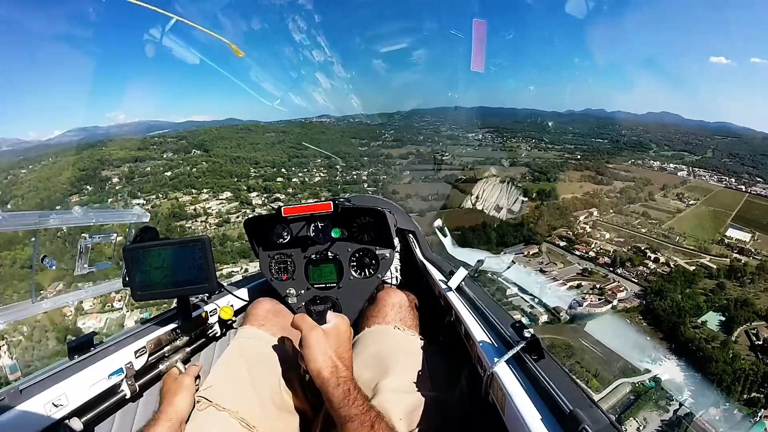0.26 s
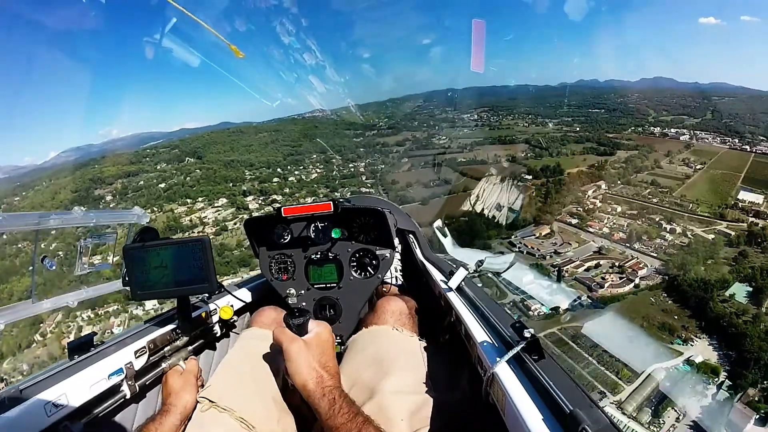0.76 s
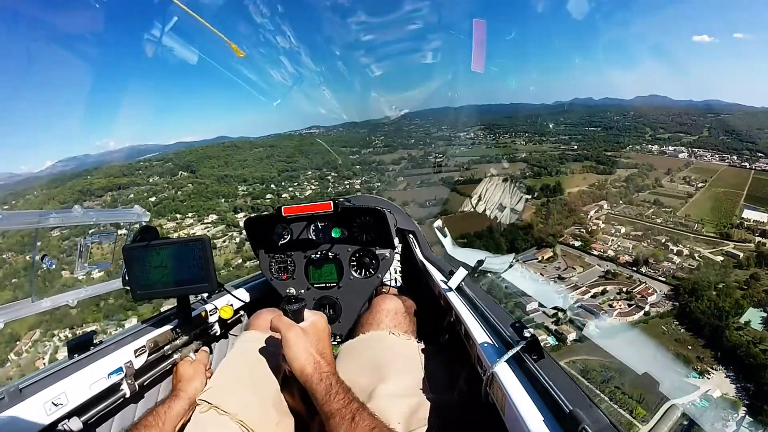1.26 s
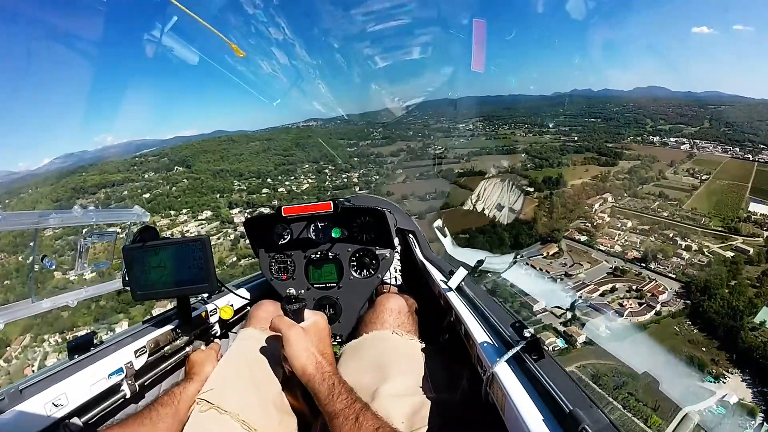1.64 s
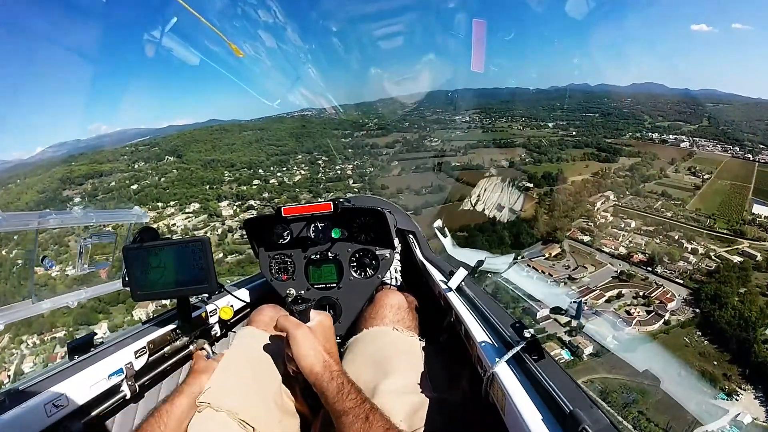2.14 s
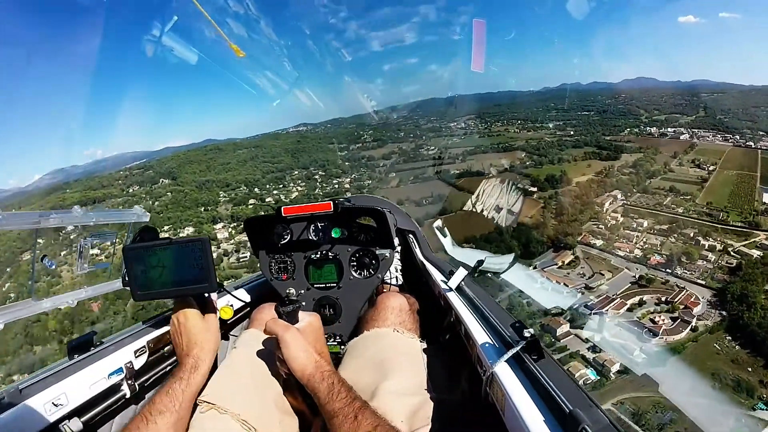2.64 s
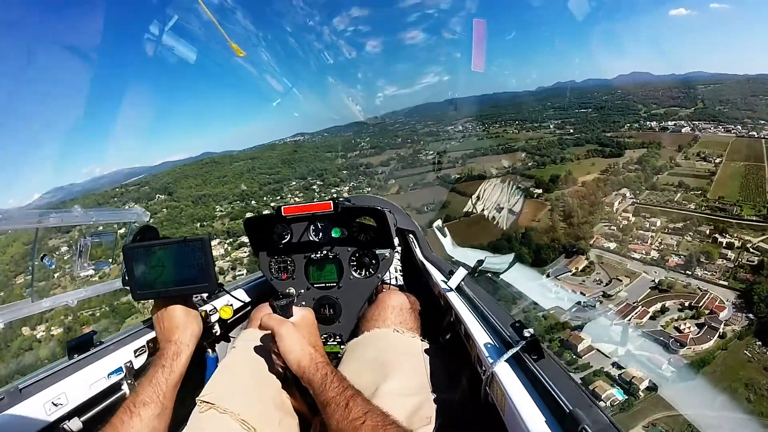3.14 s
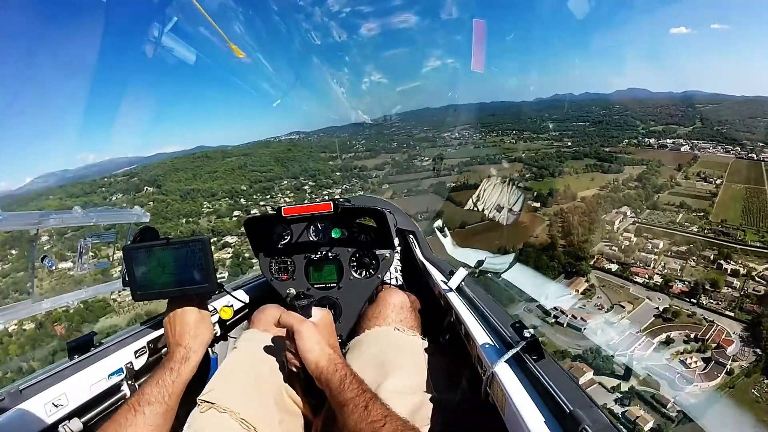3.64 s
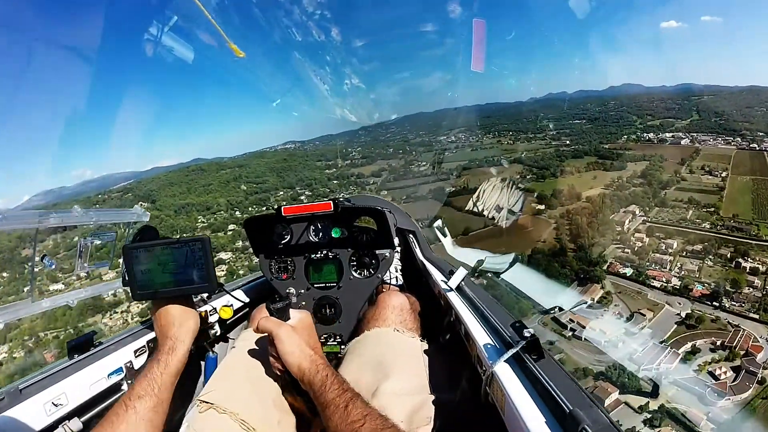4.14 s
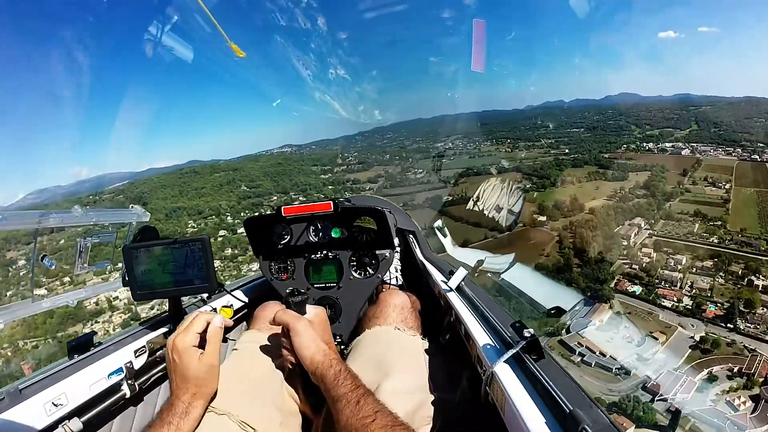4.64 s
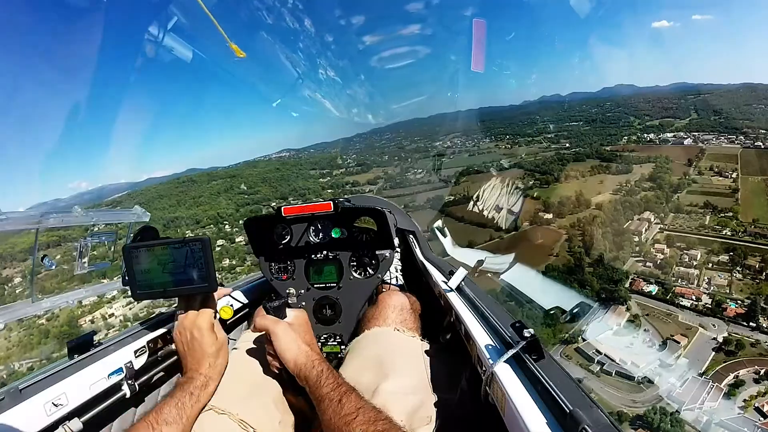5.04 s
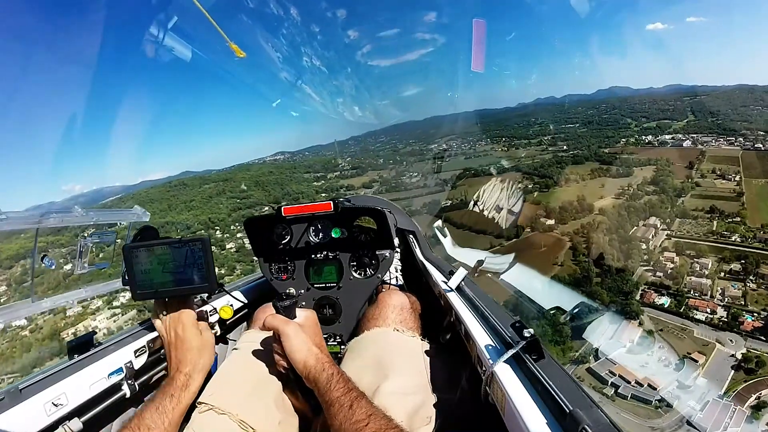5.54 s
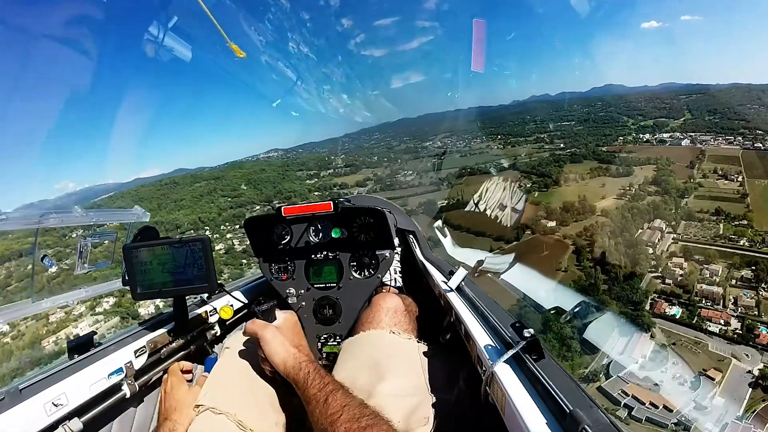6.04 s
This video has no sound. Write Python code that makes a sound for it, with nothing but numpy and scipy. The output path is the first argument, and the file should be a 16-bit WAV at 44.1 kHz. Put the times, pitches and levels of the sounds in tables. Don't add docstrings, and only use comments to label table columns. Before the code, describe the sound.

Steady rush of air with low buffeting inside a glider cockpit, a lever scraping early, then scattered padded knocks, sharp latch clicks and plastic ticks.

```python
import sys
import numpy as np
from scipy import signal
from scipy.fft import rfft, irfft
from scipy.io import wavfile
from scipy.ndimage import uniform_filter1d

SR = 44100
rng = np.random.default_rng(int(sys.argv[2]) if len(sys.argv) > 2 else 0)


def unload_wav(signal):
    wavfile.write(
        sys.argv[1],
        SR,
        np.round(np.clip(np.atleast_2d(signal).T, -1, 1) * 32767).astype(np.int16),
    )


def volts(x):
    e = np.asarray(x, float) / 20
    return 10 ** e


N = 277389

# mode_hz, level_db, t60_s
SIZZLE = [(4700, 0, .005), (5400, 0, .006), (6200, -1, .005), (7200, -6, .004), (8100, -10, .004),
          (9100, -8, .005), (10600, -15, .003), (13000, -21, .003)]


def evened(x):
    return x / np.sqrt(np.mean(x ** 2) + 1e-20)


def add(mix, start_s, sound):
    part = mix[round(start_s * SR):][:len(sound)]
    part += sound[:len(part)]


def follow(rows):
    times_s, values = np.transpose(rows)
    return np.interp(np.arange(N) / SR, times_s, values)


def stroke(start_s, rise_s, hold_s, fall_s):
    corners_s = start_s + np.cumsum([0, rise_s, hold_s, fall_s])
    return np.interp(np.arange(N) / SR, corners_s, [0, 1, 1, 0])


def wobble(ms):
    size = max(int(ms * SR / 1000), 2)
    smooth = uniform_filter1d(rng.standard_normal(N), size)
    return evened(uniform_filter1d(smooth, size))


def through(x, modes, top_hz=30000.):
    hz = np.fft.rfftfreq(len(x), 1 / SR)
    response = sum(volts(db) * 1j * hz * width / (f ** 2 - hz ** 2 + 1j * hz * width)
                   for f, width, db in modes)
    dulling = (1 + (hz / top_hz) ** 2) ** 2
    return irfft(rfft(x) * response / dulling, len(x))


def ducking_db():
    # start_s, depth_db
    ducks = [
        (1.895, 8),
        (2.92, 2.5),
        (3.088, 7.5),
        (3.73, 2),
        (4.019, 6.5),
        (4.2, 8),
        (5.2, 2.5),
        (5.402, 4),
    ]
    clamp_s, recovery_db_per_s = 0.017, 10.
    dips = [db * stroke(s, clamp_s, 0, db / recovery_db_per_s) for s, db in ducks]
    return np.max(dips, axis=0)


def hiss(ducked_db, patchy_db=0.95, gusty_db=0.53):
    # freq_hz, level_db (per Hz)
    spectrum = [(400, -16), (600, -1.5), (1000, 0.5), (1600, -2.5), (2300, -3), (3000, -0.5), (4300, -4),
                (5000, -9.5), (6300, -16.5), (8000, -23.5), (9200, -25.5), (11000, -32), (15000, -39)]
    # centre_hz, width_hz, boost_db
    panels = [(700, 26, -9), (975, 54, 9.5), (2780, 220, 3), (3910, 450, 3)]
    # time_s, tilt_db_per_octave
    whisper = [(0, 1.5), (1.3, 0.5), (1.8, 4.5), (2.7, 1), (4.2, 1), (6.29, 0.3)]
    lull_db = 6.5 * stroke(start_s=0.19, rise_s=0.5, hold_s=0.35, fall_s=0.23)
    tilt_db_per_octave = 0.18 * (lull_db + ducked_db) + follow(whisper)

    frames, hz = N // 128 + 5, np.fft.rfftfreq(512, 1 / SR)
    real, imaginary, patches = rng.standard_normal((frames, 257, 3)).T
    patches = uniform_filter1d(patches, size=8, axis=0)
    patches = evened(uniform_filter1d(patches, size=24, axis=1))
    f, db = np.transpose(spectrum)
    colour_db = np.interp(np.log(hz + 1), np.log(f + 1), db)
    colour_db = colour_db + sum(boost / (1 + (2 * (hz - centre) / width) ** 2)
                                for centre, width, boost in panels)
    octaves = np.log2(np.maximum(hz / 4500, 1))
    tilt_db = np.outer(octaves, np.resize(tilt_db_per_octave[::128], frames))
    bins = (real + 1j * imaginary) * volts(colour_db[:, None] + tilt_db + patchy_db * patches)
    rush = evened(signal.istft(bins, nperseg=512, noverlap=384)[1][:N])
    return rush * volts(2.5 + gusty_db * wobble(ms=56.0)) * volts(-lull_db)


def buffet(eddies, modes, over_db, top_hz, steady, ms):
    answer = evened(through(eddies, modes, top_hz))
    power = uniform_filter1d(answer ** 2, max(int(ms * SR / 1000), 2))
    return evened(answer / (abs(power) + 0.2) ** (steady / 2)) * volts(over_db)


def fuselage_heave(eddies, swell_db):
    # mode_hz, width_hz, level_db
    flexing = [(36.3, 16, 6.5), (52.7, 52, 5)]
    return buffet(eddies, flexing, 14.5 + 0.31 * swell_db, top_hz=178.0, steady=0.58, ms=280.0)


def cabin_boom(eddies, gust_db):
    # mode_hz, width_hz, level_db
    cabin = [(106, 14.7, 1.5), (138.4, 10.6, 0.9)]
    return buffet(eddies, cabin, gust_db + 2.07, top_hz=415.0, steady=0.15, ms=72.0)


def shell_drumming(eddies, swell_db):
    # mode_hz, width_hz, level_db
    shell = [(206.8, 12.3, 10), (252, 52, 0.5), (305, 39, -1), (374, 23, -40), (450, 400, -15.5)]
    return buffet(eddies, shell, 7.5 + 0.15 * swell_db, top_hz=1330.0, steady=0.13, ms=46.0)


def airflow():
    # time_s, level_db (over the airflow)
    gusts = [(0, 21), (.35, 20), (.62, 20.5), (1., 11.5), (1.3, 14), (1.75, 18), (2., 19), (2.3, 19.5),
             (2.65, 17), (3., 16), (3.3, 14), (3.65, 16), (4.1, 15.5), (4.5, 18), (5., 17.5), (5.5, 17.5),
             (5.9, 18), (6.29, 20.5)]
    full_gain_db, calm_db = -34., 21
    eddies, ducked_db, gust_db = rng.standard_normal(N), ducking_db(), follow(gusts)
    swell_db = gust_db - calm_db
    flow = hiss(ducked_db) + fuselage_heave(eddies, swell_db)
    flow = flow + cabin_boom(eddies, gust_db) + shell_drumming(eddies, swell_db)
    return flow * volts(full_gain_db - ducked_db)


def lever_slide(slips_per_s=910.0):
    # mode_hz, width_hz, level_db
    guide = [(296.6, 22.6, 0.5), (399, 22, -11), (517, 53, -22), (700, 50, -26), (743, 44, -20.5)]
    # time_s, extra_db
    jerks = [
        (.3, 11.3),
        (.444, 6),
        (.566, 5.8),
        (.746, 2.3),
        (.846, 3.3),
    ]
    jerk_s, drag_db = 0.035, -23
    slips = (rng.random(N) < slips_per_s / SR) * rng.standard_normal(N)
    t = np.arange(N) / SR
    catches_db = sum(db * np.exp(-((t - s) / jerk_s) ** 2) for s, db in jerks)
    drag = volts(drag_db + catches_db) * stroke(start_s=0.21, rise_s=0.328, hold_s=.33, fall_s=0.054)
    return evened(through(slips, guide, top_hz=1530.0)) * drag


def plastic_ticks(width_hz=1600.0, decay_ms=1.0):
    # start_s, level_db, pitch_hz, top_db (of the ring above it)
    tick_list = [(0.428, -23, 6200, -59), (0.4586, -42, 6540, -52), (0.5008, -29, 6170, -64),
                 (0.6848, -38.5, 6360, -75), (1.008, -33, 6200, -62), (1.2126, -32, 6630, -65),
                 (1.4636, -27, 6370, -55), (1.59, -19, 5750, -52), (2.2315, -32, 6140, -42),
                 (2.9976, -25, 6050, -55), (3.5603, -27.5, 6200, -59)]
    out, t = np.zeros(N), np.arange(1024) / SR
    for s, db, hz, top_db in tick_list:
        puff = rng.standard_normal(1024) * np.exp(-1000 * t / decay_ms)
        for level_db, centre_hz in ((db, hz), (top_db + 5, 13000)):
            tick = through(puff, [(centre_hz, width_hz, 0)])
            add(out, s, volts(level_db) * tick / abs(tick).max())
    return out


def ring(drive, modes, detune, crack_db=-7., crack_ms=3., crack_blur=.25):
    t, top_hz = np.arange(len(drive)) / SR, modes[-1][0]
    response = sum(volts(db - 60 * t / t60) * np.sin(2 * np.pi * f * d * t)
                   for (f, db, t60), d in zip(modes, detune))
    blurred = [(f, crack_blur * f, db) for f, db, _ in modes]
    splinters = evened(through(rng.standard_normal(len(t)), blurred, top_hz))
    splinters = splinters * np.exp(-1000 * t / crack_ms)
    contact = np.hanning(int(SR / top_hz) + 2)
    sound = signal.fftconvolve(np.convolve(drive, contact), response + volts(crack_db) * splinters)
    sound = sound[:len(drive)]
    return sound / abs(sound).max()


def knocks(blows, groups, answer, contacts_per_s, first, thud_ms):
    # mode_hz, level_db, t60_s
    thud = [(320, -12, .024), (378, 0, .036), (445, -10, .024)]
    out, t = np.zeros(N), np.arange(4096) / SR
    for s, thud_db, clack_db, hard_db, rattle_ms in blows:
        chance, size = rng.random(4096), rng.standard_normal(4096)
        detune = rng.uniform(0.97, 1.025, 8)
        rattle = (chance < contacts_per_s / SR) * size * np.exp(-1000 * t / max(rattle_ms, .5))
        rattle[0] = first
        pressed = np.sin(np.pi * np.minimum(1000 * t / thud_ms, 1)) ** 2
        swing = pressed * np.sin(2 * np.pi * thud[1][0] * detune[1] * t)
        push = swing + 0.23 * pressed * size
        add(out, s, volts(thud_db - 3.5) * ring(push, thud, detune, crack_db=-36.))
        for (db, share), modes in zip(answer, groups):
            add(out, s, volts(clack_db + db + share * hard_db + 9) * ring(rattle, modes, detune))
    no_bass = signal.butter(N=2, Wn=230., btype="high", fs=SR, output="sos")
    return signal.sosfilt(no_bass, out)


def padded_knocks():
    # start_s, thud_db, clack_db, hardness_db, rattle_ms
    blows = [(0.424, -23, -30, 1.5, 3.5), (0.563, -5.5, -41, 2, 6.3), (0.642, -9.5, -28.5, -18, 14),
             (1.464, -20, -24.5, -6, 5.9), (1.630, -9, -20, -7, 1.7), (1.644, -15, -22, -9, 3.6),
             (1.861, -6, -40, -23, 5), (1.875, -5, -19, -13, 6), (1.889, 3, -20.5, -4.5, 9.9),
             (2.831, -1, -18.5, 0, 3.6), (2.912, 0.5, -14.5, -14.5, 6.7), (2.975, -4.5, -25.5, -7, 4.1),
             (3.7135, -1.5, -21, -3, 3.8), (3.829, -2.5, -25.5, -4.5, 6.1), (4.01, 1, -14, -12, 7.6),
             (5.185, -3, -16.5, -10, 4.7)]
    # mode_hz, level_db, t60_s
    clack = [(540, -8, .012), (640, -5, 0.012), (760, -2, .016), (870, -2, 0.016), (1050, 1.5, 0.016),
             (1190, 1.5, .012)]
    snap = [(1350, 0.1, 0.011), (1560, -5, .01), (1900, 1, 0.016), (2380, -7, 0.0099), (2580, -6, 0.009),
            (3130, -7, 0.01), (3760, -7, 0.011), (3900, -16, .008)]
    # over_clack_db, hardness_share
    answer = [(2.5, 0.15), (1.8, 1.2), (-14, 1.6)]
    return knocks(blows, (clack, snap, SIZZLE), answer, contacts_per_s=7600.0, first=0.38, thud_ms=6.9)


def latch_snaps():
    # start_s, thud_db, clack_db, hardness_db, rattle_ms
    blows = [
        (3.053, -4, -18, -6.5, 3),
        (3.084, -26, -23, 0, 2.2),
        (3.7065, -5.5, -18, -2.5, 6.1),
        (4.1575, -30, -29, -9, 1.6),
        (4.1625, -24, -13.5, -6, 6.6),
        (4.194, -10, -17.5, 3, 2.4),
        (5.3905, -5.5, -16.5, -9, 6.9),
    ]
    # mode_hz, level_db, t60_s
    clack = [(610, -5, 0.018), (820, -3, 0.018), (1030, 3, 0.026), (1150, 2.1, 0.018)]
    snap = [(1600, -2, .012), (1800, -2, .012), (2200, -5, .009), (2750, 0.1, .012), (3050, -1.5, .01),
            (3500, -1, .008), (4100, -2, .007)]
    # over_clack_db, hardness_share
    answer = [(1.4, -0.15), (-2.5, -0.88), (-0.91, 1.1)]
    return knocks(blows, (clack, snap, SIZZLE), answer, contacts_per_s=6800.0, first=3.0, thud_ms=6.5)


def cockpit(x, wet_db, t60):
    t = np.arange(2048) / SR
    echoes = (rng.random(2048) < .15) * rng.standard_normal(2048)
    echoes = echoes * volts(-60 * t / t60) * (t > .0012)
    echoes = uniform_filter1d(echoes, size=3)
    return x + volts(wet_db) * signal.oaconvolve(x, echoes / np.linalg.norm(echoes))[:N]


def scene():
    hits = plastic_ticks() + padded_knocks() + latch_snaps()
    hits = cockpit(hits, wet_db=-14., t60=.035)
    return (airflow() + lever_slide() + hits)[None]


def top_cut(x):
    return signal.sosfilt(signal.butter(12, 15130, fs=SR, output="sos"), x)


def record(dry):
    held = dry / (1 + abs(dry / .95) ** 5) ** (1 / 5)
    edge = signal.firwin(255, 15050, window=("kaiser", 8), fs=SR)[None]
    return top_cut(signal.oaconvolve(held, edge, "same"))


dry = scene()
out = record(dry)
unload_wav(out)
```